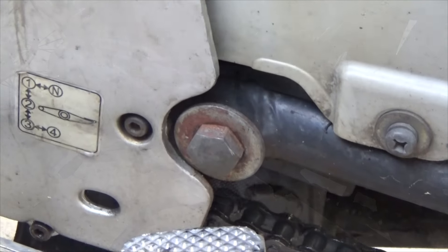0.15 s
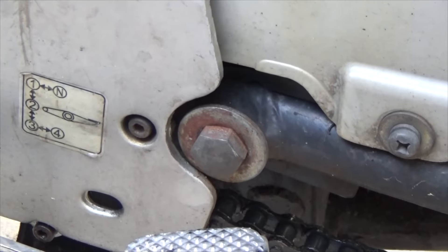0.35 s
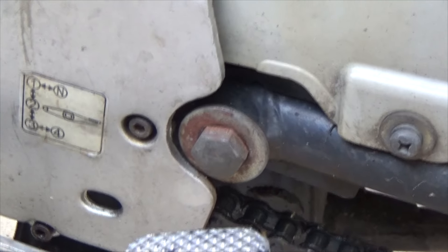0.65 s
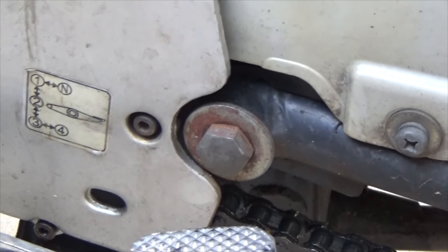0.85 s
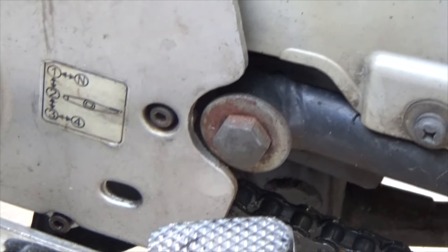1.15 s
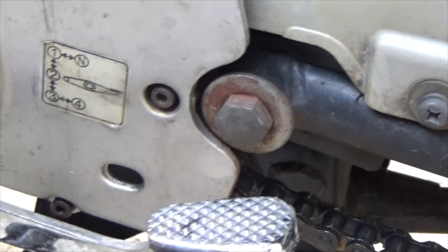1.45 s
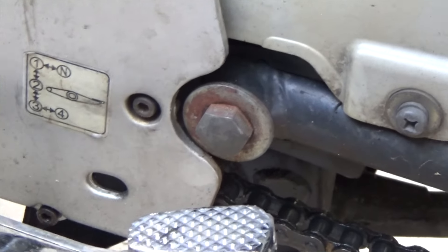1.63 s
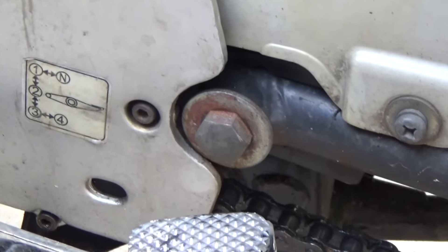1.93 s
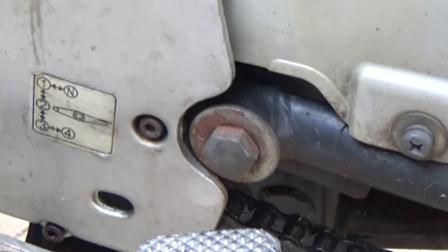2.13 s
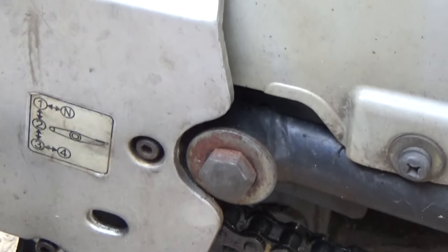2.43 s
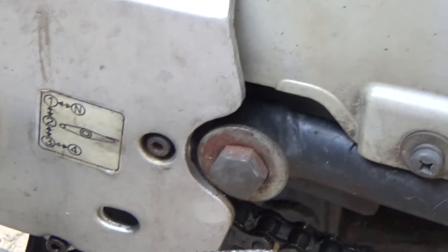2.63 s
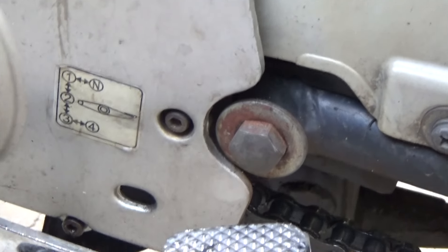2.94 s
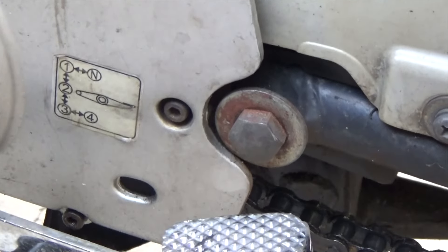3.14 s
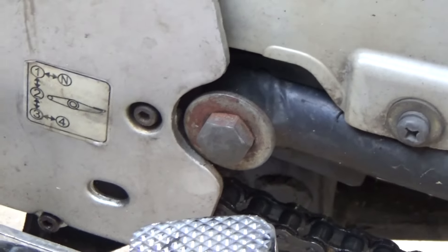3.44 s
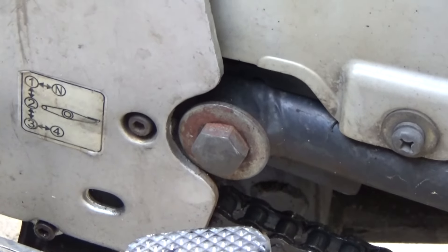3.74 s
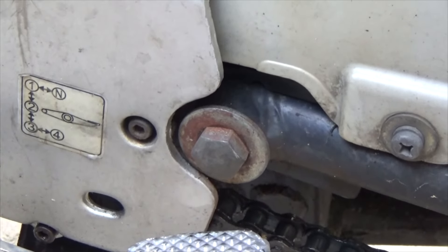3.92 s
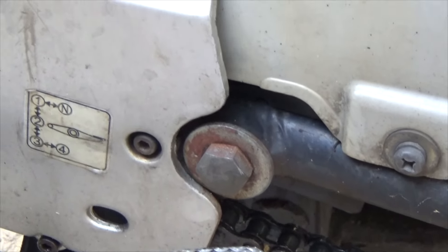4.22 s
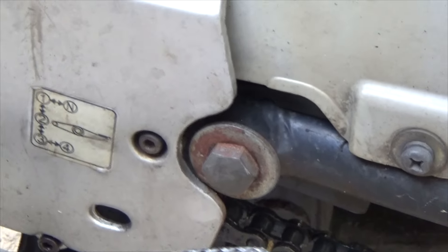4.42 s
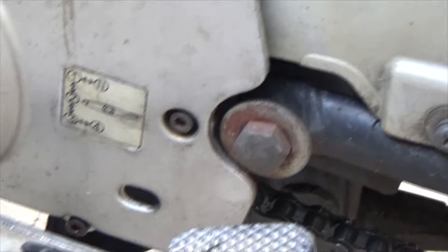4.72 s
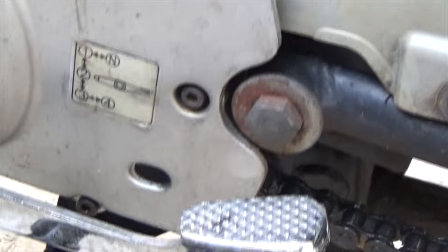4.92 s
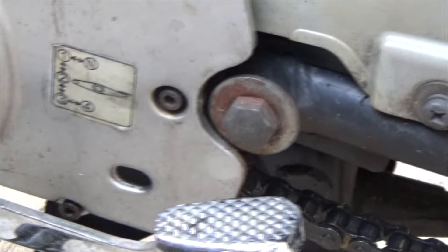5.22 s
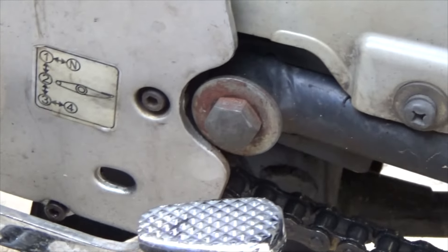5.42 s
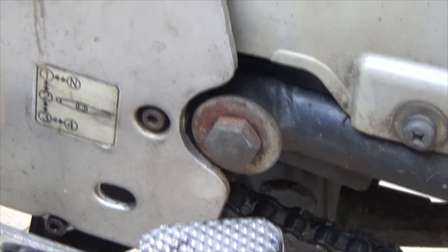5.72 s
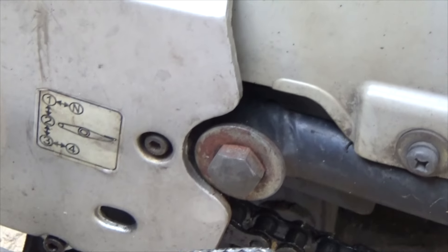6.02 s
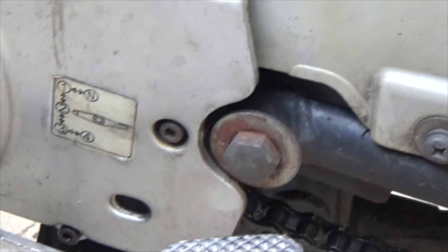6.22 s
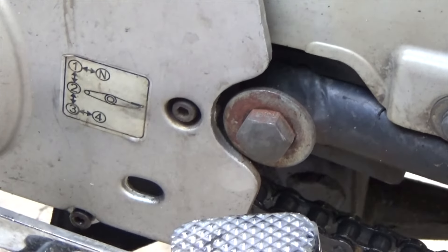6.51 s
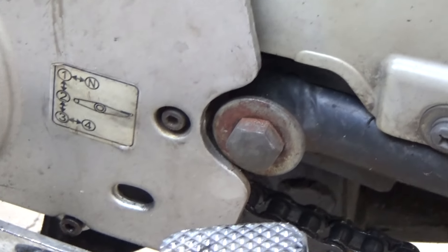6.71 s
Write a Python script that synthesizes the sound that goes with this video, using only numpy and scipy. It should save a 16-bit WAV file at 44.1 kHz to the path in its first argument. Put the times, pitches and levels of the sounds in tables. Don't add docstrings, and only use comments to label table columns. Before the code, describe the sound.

Close outdoors, a motorcycle is pushed down and let up. After a low wind gust and small rubber creaks, its dry pivot scrapes in a fast broken judder, squeals faintly, then groans briefly. Three more rounds follow, each led by soft chattering knocks; the last slides roughly before its groan. A faint hum, insects and rustle lie beneath.

```python
import sys
import numpy as np
from scipy import signal
from scipy.fft import rfft, irfft
from scipy.io import wavfile
from scipy.ndimage import uniform_filter1d

SR = 44100
rng = np.random.default_rng(int(sys.argv[2]) if len(sys.argv) > 2 else 0)


def boost(x):
    u = np.asarray(x, float) / 20
    return 10 ** u


def dump_mix(stems):
    frames = np.atleast_2d(stems).T
    limited = np.clip(frames, -1, 1)
    pcm = np.round(limited * 32767).astype(np.int16)
    wavfile.write(sys.argv[1], SR, pcm)


N = 302526
TIME = np.arange(N) / SR

# t/s, length/s, level/dB
SCRAPES = [(0.34, 0.018, -23.5), (0.362, 0.005, -22.5), (0.393, 0.022, -21.5), (0.464, 0.004, -20),
           (0.5437, 0.0053, -22), (0.552, 0.01, -21.5), (0.594, 0.019, -23), (0.661, 0.007, -21.5),
           (0.7258, 0.005, -18.5), (0.735, 0.0045, -24.5), (2.225, 0.015, -20.5), (2.251, 0.033, -22),
           (2.309, 0.024, -21.5), (2.358, 0.03, -23), (2.397, 0.037, -22), (2.456, 0.022, -23.5),
           (2.505, 0.021, -23.5), (2.5643, 0.0048, -22), (4.194, 0.0063, -26.5), (4.203, 0.02, -20.5),
           (4.248, 0.015, -21), (4.265, 0.0085, -21), (4.2957, 0.025, -21.5), (4.348, 0.023, -22.5),
           (4.3944, 0.021, -21.5), (4.447, 0.018, -23), (4.495, 0.027, -24.5), (4.545, 0.0047, -22.5),
           (4.5532, 0.0073, -25.5)]
SCRAPE_HZ, SCRAPE_ROUGH = 269.2, 0.72
# (t/s, slips a second f/Hz)
STROKES = [
    (-18.5, 1.436, -9.5, .33, [(1.402, 166), (1.436, 174.4), (1.45, 178.3), (1.472, 231.4), (1.483, 240.8), (1.505, 242.5), (1.522, 120)]),
    (-19.5, 3.5, -4, .3, [(2.992, 242.2), (3.055, 270.5), (3.082, 264.8), (3.10, 243.6), (3.114, 215.6), (3.13, 174.4)]),
    (-19, 5.055, -9, .27, [(4.8956, 129.7), (4.93, 125.3), (4.955, 162.2), (5.018, 183.4), (5.036, 243.2), (5.076, 276), (5.112, 282.3), (5.13, 235), (5.15, 142)]),
    (-19, 6.53, -3, 0.45, [(6.396, 140.6), (6.42, 230.2), (6.44, 259.2), (6.485, 302.3), (6.513, 273.7), (6.535, 219.3), (6.552, 178)]),
]
START_DB, RISE_S = -4.5, 0.029
LOCKED_SHARE, LOCK_HZ, LOCK_SPAN_HZ = 0.4, 235, 23.9
# t/s, level/dB
GRABS = [
    (1.396, -27),
    (1.53, -26.5),
    (1.546, -25.5),
    (4.8478, -23),
    (4.8637, -23.5),
    (4.8842, -17.5),
    (5.1625, -24.5),
    (6.3376, -23),
    (6.38, -20.5),
    (6.389, -24),
]
GRAB_S = 0.002
# t/s, peak level/dB
HALTS = [(3.1324, -10.5), (3.1379, -13), (3.1444, -12), (3.15, -16), (3.158, -15), (3.1667, -12),
         (3.1762, -11), (3.1864, -15), (3.1964, -12), (3.2064, -14), (3.2154, -13.5), (3.2249, -16.5),
         (3.2327, -15.5), (3.2394, -13), (3.2463, -13), (3.2529, -14.5), (3.2594, -18), (3.2664, -16),
         (3.275, -17), (3.2844, -17), (6.5541, -12), (6.5592, -15), (6.5654, -12), (6.5726, -14),
         (6.5778, -15), (6.5857, -15.5), (6.5936, -13.5), (6.6014, -11.5), (6.6105, -15), (6.6214, -13)]
HALT_S, HALT_DB, HALT_ROUGH = 0.0045, -7, 0.96
# t/s, level/dB, slips a second f/Hz,
# roughness (0-1)
SLIDE = [
    (5.839, -21.5, 149.8, 0.61),
    (5.87, -19, 276.1, 0.63),
    (5.95, -21, 215.3, 0.69),
    (6.02, -20, 320, 0.59),
    (6.043, -25.5, 339.6, 0.47),
    (6.048, -35, 201, 0.68),
    (6.068, -23, 153, .55),
    (6.085, -38, 150.7, 0.5),
]
# t/s, level/dB
TICKS = [
    (2.883, -58),
    (3.641, -58),
    (6.146, -59),
    (6.248, -52),
    (6.274, -57),
]
# f/Hz, width/Hz, level/dB
STROKE_MODES = [(430, 73, -6.5), (1310, 80, -3), (1964, 137, 0.5), (2406, 220, -4.5), (3257, 52, 0.5),
                (3777, 116, 2), (4130, 110, -5.5), (4620, 130, -3), (5260, 73, -24), (5550, 40, -25),
                (5960, 47, -13), (6200, 140, 3), (6570, 140, 2), (6800, 100, -7), (7100, 190, -1.5),
                (8150, 280, -0.5), (8700, 51, -16), (9800, 250, -5), (10220, 160, -6), (10400, 160, -13),
                (11040, 200, -5), (12800, 220, -16)]
# f/Hz, level/dB per Hz
STROKE_DENSE = [(120, -56), (310, -24), (490, -3), (790, -11.5), (1100, -2.5), (1450, -5.5), (5100, -4),
                (6370, -3), (14400, -16), (15800, -30), (16700, -76)]
# f/Hz, width/Hz, level/dB
SCRAPE_MODES = [(2040, 180, -1.5), (2444, 210, -3.5), (3280, 130, 3), (3750, 130, -1.5), (4220, 210, -4),
                (4740, 96, -3), (5230, 230, 2), (5530, 200, -2.5), (6100, 170, -9), (6930, 260, 3),
                (7340, 110, -13), (8670, 140, -7), (8600, 60, -26), (9200, 89, -5), (8950, 89, -1.5),
                (9650, 290, -3.5), (10150, 200, -8.5), (10700, 170, -4), (11550, 155, -2), (12950, 120, -9)]
# f/Hz, level/dB per Hz
SCRAPE_DENSE = [(120, -40), (200, -31), (430, -3), (929, -6), (1980, -2), (3040, -3.5), (3270, -3.5),
                (5910, -6), (6990, -1.5), (11900, -10), (16700, -30)]
STROKE_T60, SCRAPE_T60 = 0.032, 0.023
# f/Hz, level/dB, t60/s
RINGS = [(495, -6, .3), (1450, -12, .4), (1857, -8, .25), (2132, -5, .6), (3165, -14, .7), (3600, -6, .3),
         (4090, -8, .3), (6200, -5, .2)]
# f/Hz, level/dB
TAIL = [(300, 12.5), (3500, -3.5), (8000, -8.5), (15000, -17)]
# f/Hz, side minus mid level/dB
WIDTH = [(60, -15), (150, -11), (380, -16), (950, -13.5), (2380, -10.5), (5500, -10.5), (8500, -7),
         (15000, -20)]
# f/Hz, left minus right level/dB
LEAN = [(60, 0), (180, 2), (550, -2.5), (1200, -.3), (2500, -2), (4970, -1.8), (9000, -1.5), (15000, 0.5)]
# t/s, knock level/dB, knock f/Hz, rasp level/dB
CREAKS = [(0.012, -29, 463, -41.5), (0.065, -31, 417, -47), (0.129, -27, 410, -37),
          (0.176, -25, 458, -39.5), (0.205, -37, 500, -52), (0.24, -30, 433, -49), (0.856, -29, 430, -43.5),
          (1.834, -40, 449, -50), (1.916, -34, 420, -50), (2.75, -34.5, 579, -55), (2.843, -35, 680, -54),
          (2.881, -30.5, 844, -48), (3.631, -33, 420, -54), (3.644, -53, 452, -48.5),
          (3.761, -32.5, 430, -45.5), (3.861, -39, 442, -51), (5.473, -30, 430, -47.5),
          (5.497, -25, 440, -39.5), (5.525, -35, 420, -49), (5.82, -24, 484, -36), (6.146, -47, 692, -42),
          (6.249, -60, 413.7, -65), (6.275, -46, 663, -56), (6.823, -25, 441, -35), (6.843, -35, 695, -30)]
# t/s, level/dB, f/Hz
KNOCKS = [(0.334, -25, 486), (0.386, -25, 506), (0.453, -24, 775), (0.467, -22, 470), (0.537, -29, 496),
          (0.653, -23, 707), (0.717, -20, 680), (1.466, -40, 402), (2.421, -24, 470), (3.131, -25, 413),
          (3.231, -22.5, 450), (3.278, -23.5, 383), (4.19, -26, 650), (4.341, -28, 840), (5.041, -37, 478),
          (5.149, -27.5, 428), (5.873, -30, 500), (6.081, -21, 720), (6.554, -20.5, 395), (6.633, -25, 845)]
# (t/s, knock level/dB, knock f/Hz)
CHATTER = [
    (-40, [(1.941, -34, 440), (1.984, -36, 885), (2.022, -25, 474), (2.061, -27, 610), (2.106, -26.5, 710), (2.159, -28, 454), (2.204, -26.5, 546)]),
    (-37, [(3.894, -29.5, 457), (3.948, -28, 430), (4.002, -24.5, 470), (4.046, -42, 522), (4.094, -44, 484), (4.141, -23, 687)]),
    (-33.5, [(5.567, -23.5, 440), (5.603, -45, 458), (5.642, -17, 580), (5.684, -24, 870), (5.722, -20.5, 720), (5.771, -24, 684)]),
]
RASP_S, KNOCK_LAG_S = 0.022, 0.00419
# f/Hz, width/Hz, level/dB
BUSH_MODES = [(458, 45, 2.5), (851, 23, -1.5), (1120, 50, -4.5), (1405, 23, -25.5), (1584, 27, -27),
              (1830, 74, -5.5), (2890, 68, -18.5), (3420, 62, -13), (4740, 150, -16), (4880, 55, -23),
              (10300, 300, -22.5), (12700, 400, -30)]
# f/Hz, level/dB per Hz
BUSH_DENSE = [(120, -22), (200, -24), (451, -5), (864, -0.5), (1220, -19.5), (1380, -8), (4160, -25),
              (10300, -32.5), (15000, -45)]
# t/s, length/s, top level/dB, first f/Hz, last f/Hz
SQUEALS = [(1.158, 0.05, -51, 1000, 784), (1.215, 0.061, -53, 1120, 1130), (1.213, .024, -54, 1820, 1790),
           (1.246, 0.027, -56, 1800, 1790), (1.27, 0.035, -59, 1223, 1120),
           (1.292, 0.072, -52.5, 1196, 2140), (5.686, 0.017, -42, 1300, 1750),
           (5.783, .013, -48, 1700, 2200), (2.687, 0.058, -41, 622, 857), (2.88, 0.047, -45, 792, 880),
           (4.787, 0.083, -44.5, 810, 840), (6.15, 0.035, -36, 670, 850), (6.182, 0.037, -46, 890, 1350),
           (6.252, 0.014, -54, 1696, 1710), (6.273, 0.0089, -42, 1770, 1670), (6.315, 0.022, -41, 995, 615),
           (6.828, 0.022, -26, 565, 773), (6.844, 0.022, -23, 640, 554)]
SWELL_DB, TOP_AT, LET_GO_DB = -8, 0.65, -5
# f/Hz, level/dB per Hz
AIR = [(410, -53), (700, 8.5), (1040, 1.5), (2710, -7), (3260, -6.5), (3390, -5), (4850, -12),
       (10300, -7.5), (15200, -28), (16700, -47)]
AIR_DB = -62.5
# f/Hz, level/dB per Hz
RUMBLE = [(20, -19), (40, -3.5), (100, -0.5), (200, -1.5), (300, -2.5), (500, -80)]
RUMBLE_DB, GUST_DB, GUST_END_S = -53, 8.5, 0.25
# f/Hz, level/dB per Hz
HUM = [(66, -44), (75, -13), (80, 14.5), (85, -11), (94, -42.5)]
# t/s, level/dB
NEARING = [(0, -67.5), (1.25, -74), (1.75, -58.5), (2.85, -58), (3.55, -49.5), (4.0, -55), (4.5, -54),
           (6.86, -55)]
# f/Hz, level/dB per Hz
RUSTLE = [(200, -5.5), (300, -4), (450, 4.5), (850, -4), (1100, -14.5), (2500, -21), (5000, -30)]
# t/s, level/dB
LOAD = [(0, -48), (.24, -53), (.33, -49.5), (.9, -53.5), (1.2, -60), (1.75, -56), (2.1, -46.5),
        (2.85, -50.5), (3.1, -47.5), (3.55, -57), (4.0, -54), (4.3, -44), (4.75, -53.5), (5.7, -53.5),
        (6.25, -53), (6.86, -51.5)]
# f/Hz, likeness (-1 to 1)
SAME = [(60, 1), (180, 0.74), (550, 0.48), (1650, 0.07), (4970, 0.52), (15000, 0.89)]


def pivot():
    strokes = sum(stroke(*row) for row in STROKES)
    for s, db in GRABS:
        strokes += slips([(s, db, SCRAPE_HZ, 0.3), (s + GRAB_S, db, SCRAPE_HZ, 0.3)], -25)
    for s, peak_db in HALTS:
        db = peak_db + HALT_DB
        strokes += slips([(s, db, SCRAPE_HZ, HALT_ROUGH), (s + HALT_S, db, SCRAPE_HZ, HALT_ROUGH)], -21)

    scrapes = slips(SLIDE, -32)
    for s, db in TICKS:
        scrapes += slips([(s, db, SCRAPE_HZ, 0.7), (s + HALT_S, db, SCRAPE_HZ, 0.7)], -99)
    cracks = np.zeros(N)
    for s, db in GRABS:
        cracks[round(s * SR)] = boost(2 * db + 40)
    for held_db, *_, pace in STROKES:
        cracks[round(pace[0][0] * SR)] = boost(held_db + 21)
    for s, length, db in SCRAPES:
        hz = SCRAPE_HZ * rng.uniform(0.7, 1.3)
        scrapes += slips([(s, db - 0.2, hz, SCRAPE_ROUGH), (s + length, db + 0.22, hz, SCRAPE_ROUGH)], -99)
        cracks[round(s * SR)] = boost(db + 25.5)
    scrapes += signal.lfilter(*signal.butter(2, 9000, "high", fs=SR), cracks)

    stroke_body = body(STROKE_MODES, STROKE_DENSE, -4.5, STROKE_T60, -12, 0.29, -29)
    scrape_body = body(SCRAPE_MODES, SCRAPE_DENSE, -3, SCRAPE_T60, -8.5, 0.26, -23.5)
    return boost(3) * ring(strokes, stroke_body) + boost(2.5) * ring(scrapes, scrape_body)


def stroke(held_db, ease_s, fade_db, loose, pace):
    s, hz = np.transpose(pace)
    t = np.linspace(s[0], s[-1], num=60)
    hz = np.interp(t, s, hz)
    level_db = held_db + np.interp(t, [s[0], s[0] + RISE_S, ease_s, s[-1]], [START_DB, 0, 0, fade_db])
    locked = 1 / (1 + np.exp((LOCK_HZ - hz) / LOCK_SPAN_HZ * 4))
    rough = loose * (1 - (1 - LOCKED_SHARE) * locked)
    return slips(np.transpose([t, level_db, hz, rough]))


def slips(rows, full_db=-23, jitter=0.25, grit_s=0.0049):
    s, *columns = np.transpose(rows)
    t = np.arange(s[0], s[-1], 1 / SR)
    level_db, hz, rough = (np.interp(t, s, c) for c in columns)
    share = np.clip(rough, 0, 1) ** 2
    wander, grit, size = rng.standard_normal((len(t), 3)).T

    unsteady = evened(uniform_filter1d(wander, size=300))
    turns = np.cumsum(hz * (1 + jitter * share * unsteady)) / SR
    snap = np.diff(np.floor(turns), prepend=-1) > 0
    snaps = snap * boost(2.7 * rough * np.clip(size, -1.5, 1.5)) * np.sqrt(SR / hz)
    since_snap = (turns % 1) / hz
    slide = grit * evened(np.exp(-since_snap / grit_s) + 0.018)
    force = boost(level_db) * (np.sqrt(1 - share) * snaps + np.sqrt(share) * slide)

    dull = signal.lfilter(*signal.butter(2, 5000, fs=SR), force)
    bright = boost(4.3 * np.minimum(level_db - full_db, 0))
    train = np.zeros(N)
    part = train[round(s[0] * SR):][:len(t)]
    part += (dull + bright * (force - dull))[:len(part)]
    return train


def body(modes, dense, dense_db, fast_t60, tail_db, tail_t60, ring_db):
    t = TIME[:SR // 2]
    hz = np.fft.rfftfreq(len(t), 1 / SR)
    fast, tail = rng.standard_normal((2, 2, len(t)))
    fast = rfft(fast * boost(-60 * t / fast_t60))
    flatten = uniform_filter1d(abs(fast) ** 2, size=60) ** -0.5
    fast *= np.array([causal(gain) for gain in flatten])
    tail = rfft(tail * boost(-60 * t / tail_t60)) * boost(read(TAIL, hz))

    power = boost(read(dense, hz) + dense_db) ** 2
    for f, width, db in modes:
        power += boost(db) ** 2 / (1 + (1.41 * (hz - f) / width) ** 2) ** 2
    blurred = uniform_filter1d(power, size=100)
    mid, side = (fast * causal(np.sqrt(power))
                 + boost(tail_db) * tail / np.std(tail) * causal(np.sqrt(blurred)))
    rings = rfft(sum(boost(db - 60 * t / t60) * np.sin(2 * np.pi * f * t) for f, db, t60 in RINGS))
    mid = mid + boost(ring_db) * rings * np.std(mid) / np.std(rings)

    side = side * boost(read(WIDTH, hz))
    lean = boost(read(LEAN, hz) / 2)
    pair = irfft(np.array([(mid + side) * lean, (mid - side) / lean]), len(t))
    pair *= np.clip(9 - 20 * t, 0, 1)
    return pair / np.linalg.norm(pair.mean(0))


def ring(train, response):
    return signal.oaconvolve(train[None], response, axes=1)[:, :N]


def bush():
    knocks, rasps, t = np.zeros(N), np.zeros(N), TIME[:SR // 20]
    shape = (t / 0.0021) * np.exp(1 - t / 0.0025)
    bend = t * (0.875 + 15 * t)
    chatter_knocks = [(s + KNOCK_LAG_S, *knock) for _, rows in CHATTER for s, *knock in rows]
    for s, db, hz, *_ in CREAKS + KNOCKS + chatter_knocks:
        part = knocks[round(s * SR):][:len(t)]
        part += (boost(db - 5.5) * shape * np.sin(2 * np.pi * hz * bend))[:len(part)]

    chatter_creaks = [(*row, rasp_db) for rasp_db, rows in CHATTER for row in rows]
    for s, _, _, db in CREAKS + chatter_creaks:
        rasps += slips([(s, db + 4, 190, 0.75), (s + RASP_S, db - 4, 190, 0.75)], -99)
    rasps += slips([(1.155, -52.5, 417, 0.84), (1.25, -55.5, 569, 0.82), (1.33, -64, 690, 1)], -99)
    bush_body = body(BUSH_MODES, BUSH_DENSE, -1.6, 0.039, -11, 0.2, -35)
    return knocks * boost([[-0.6], [0.6]]) + ring(rasps, bush_body)


def squeals():
    out = np.zeros(N)
    for s, length, top_db, first_hz, last_hz in SQUEALS:
        along = np.arange(0, length, 1 / SR) / length
        flutter = evened(uniform_filter1d(rng.standard_normal(4000), size=300))[:len(along)]
        hz = (first_hz + (last_hz - first_hz) * along) * (1 + 0.03 * flutter)
        turns = np.cumsum(hz) / SR
        step_db = -(top_db + 57) - 12 * along ** 3
        tone = sum(boost(step_db * k) * np.sin(2 * np.pi * (k + 1) * turns) for k in range(4))
        swell_db = np.interp(along, [0, TOP_AT, 1], [SWELL_DB, 0, LET_GO_DB])
        level_db = top_db + swell_db + 4 * flutter
        part = out[round(s * SR):][:len(along)]
        part += (boost(level_db) * signal.windows.tukey(len(along), 0.3) * tone)[:len(part)]
    return out


def surroundings():
    gust_db = GUST_DB / (1 + np.exp((TIME - GUST_END_S) / 0.014))
    lumps = evened(uniform_filter1d(rng.standard_normal(N), size=900))
    air = boost(AIR_DB + 4.5) * noise(AIR)
    rumble = boost(RUMBLE_DB + gust_db) * noise(RUMBLE)
    hum = boost(np.interp(TIME, *np.transpose(NEARING)) + 2.34 * gust_db) * noise(HUM)
    rustle = boost(np.interp(TIME, *np.transpose(LOAD)) + 2.5 * lumps) * noise(RUSTLE)
    return air + rumble + hum + rustle


def noise(points):
    hz = np.fft.rfftfreq(N, 1 / SR)
    same = np.clip(read(SAME, hz), -1, 1)
    a, b = rfft(rng.standard_normal((2, N)))
    pair = np.array([a, same * a + np.sqrt(1 - same ** 2) * b])
    return evened(irfft(pair * boost(read(points, hz)), N))


def evened(x):
    return x / np.sqrt(np.mean(x ** 2) + 1e-20)


def read(points, hz):
    f, value = np.transpose(points)
    return np.interp(np.log(hz + 1), np.log(f + 1), value)


def causal(gain):
    cepstrum = irfft(np.log(gain + 1e-5))
    half = len(cepstrum) // 2
    cepstrum[1:half] *= 2
    cepstrum[half + 1:] = 0
    return np.exp(rfft(cepstrum))


def scene():
    return pivot() + bush() + squeals() + surroundings()


def low_pass(x):
    return signal.sosfilt(signal.butter(12, 16820, fs=SR, output="sos"), x)


def record(dry):
    power = signal.lfilter([0.012], [1, -0.988], (dry ** 2).mean(0))
    power_db = 10 * np.log10(power + 1e-12)
    fall = TIME * 250
    over_db = np.maximum(np.maximum.accumulate(power_db + fall) - fall + 22.5, 0)
    ceiling = 0.45
    held = ceiling * np.tanh(dry / boost(0.52 * over_db) / ceiling)
    held = signal.oaconvolve(held, signal.firwin(255, 16300, fs=SR)[None], "same")
    return low_pass(held)


dry = scene()
out = record(dry)
dump_mix(out)
```